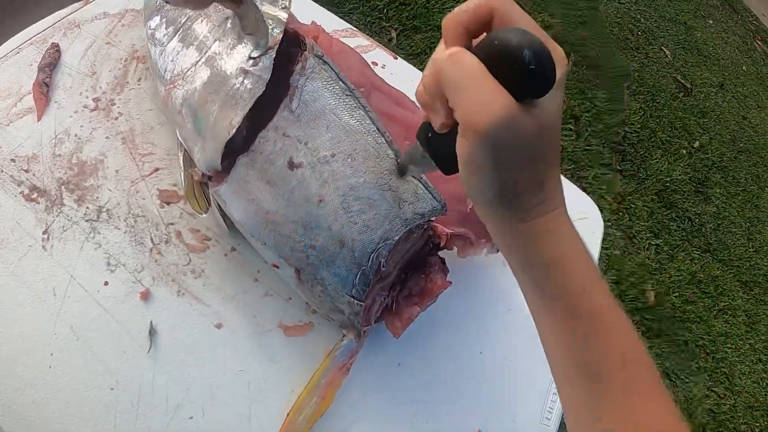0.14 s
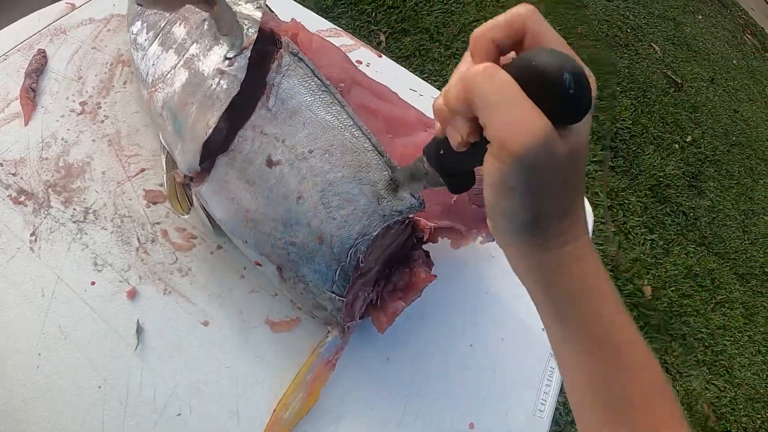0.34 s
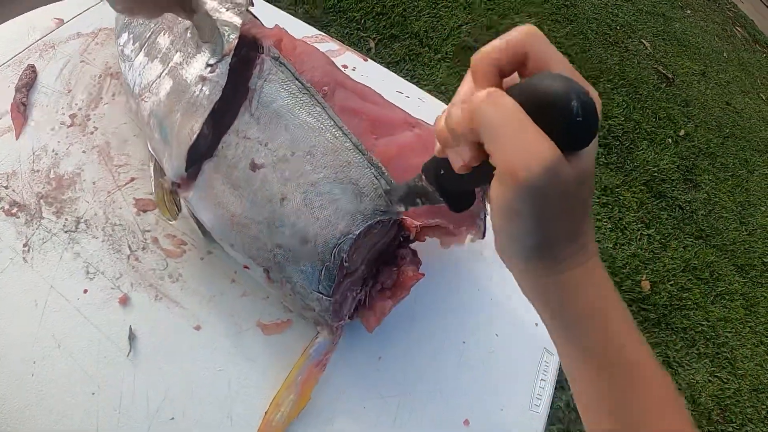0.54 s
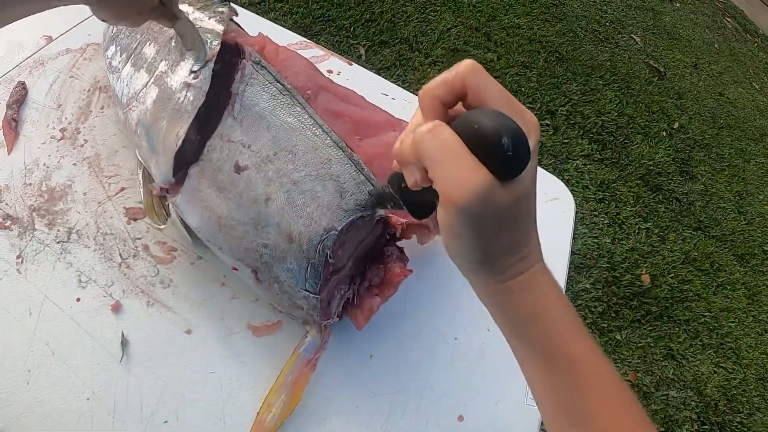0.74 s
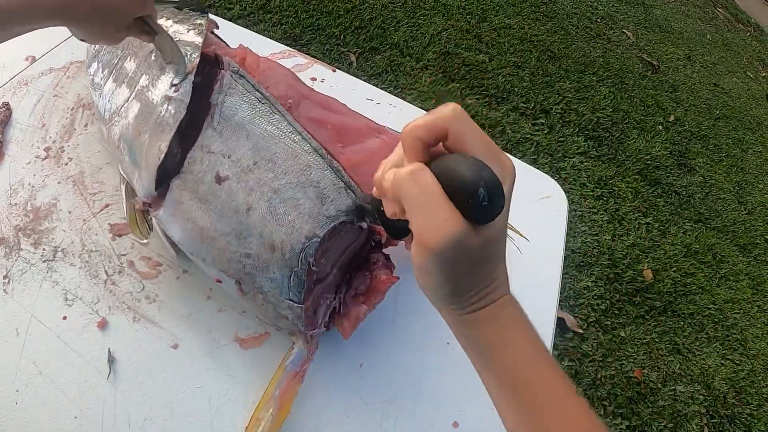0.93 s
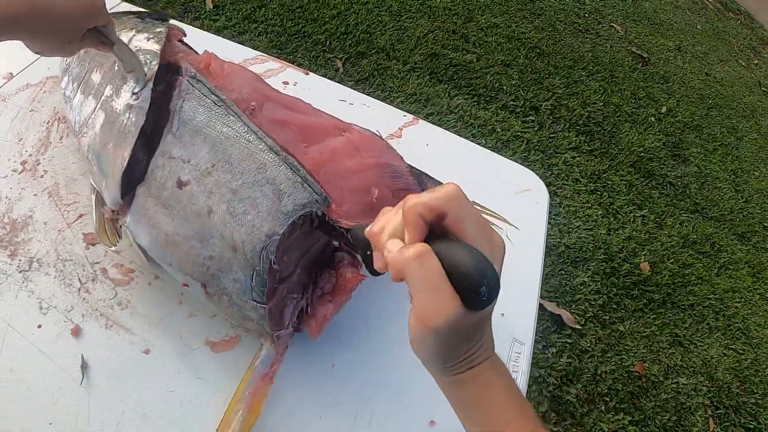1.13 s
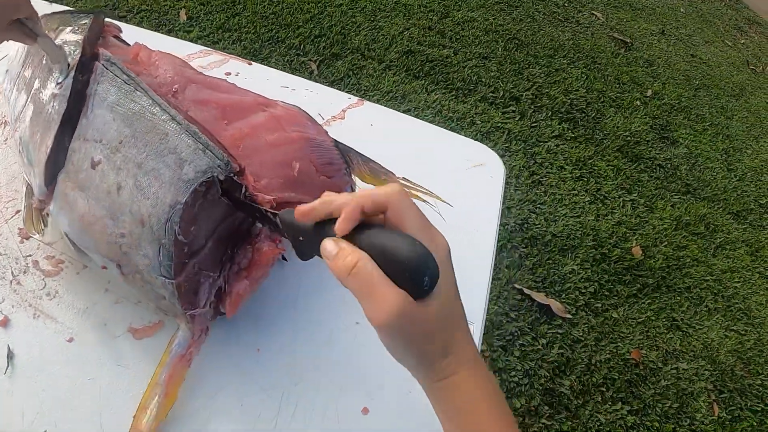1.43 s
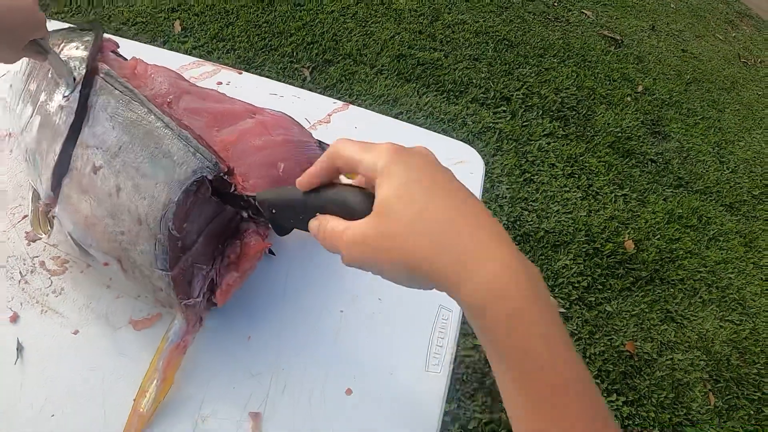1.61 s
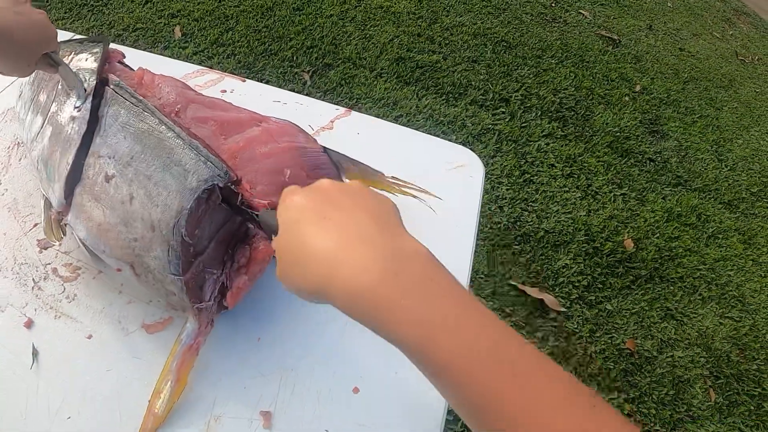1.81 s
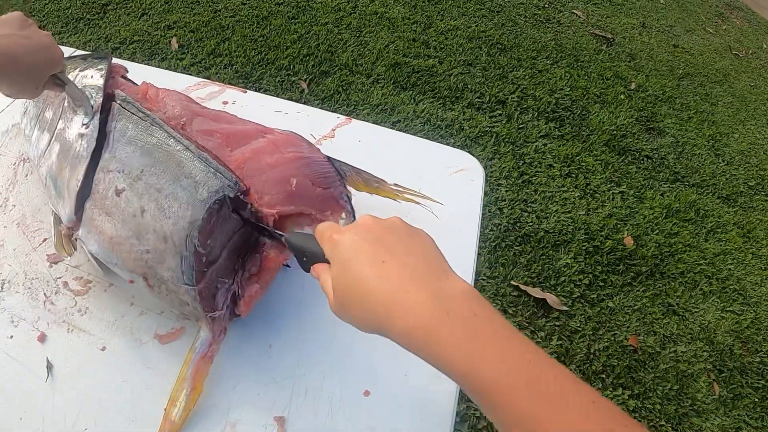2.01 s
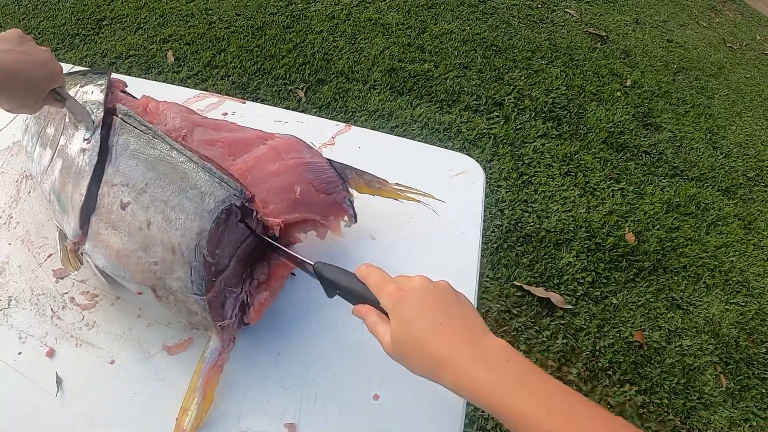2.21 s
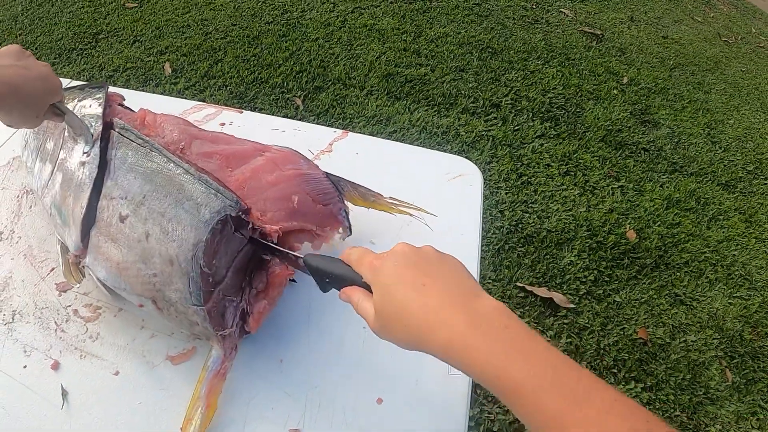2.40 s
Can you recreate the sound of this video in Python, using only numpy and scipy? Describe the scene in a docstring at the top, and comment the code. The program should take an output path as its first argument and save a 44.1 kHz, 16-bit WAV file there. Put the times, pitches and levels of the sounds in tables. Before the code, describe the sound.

Close knife cutting of a big raw fish: scratchy strokes, wet slides, sharp bone snaps, table knocks

```python
"""The blade is heard first, rasping through the skin of a large fish in short strokes, close by outdoors.
It slides and squelches through wet flesh and snaps past small bones, and shoves thud in a hollow
plastic table above a light wind rumble. Rasps are dense impulses, the slide is hiss with ticks, squelches
are narrow noise bands, snaps are noise bursts through resonances with short rings and low knocks,
thuds are low table modes with a dull rub, and wind is low noise with one puff."""
import sys
import numpy as np
from scipy.fft import rfft, irfft, next_fast_len
from scipy.io import wavfile

SR = 44100
rng = np.random.default_rng(int(sys.argv[2]) if len(sys.argv) > 2 else 0)


def log_audio(samples):
    """Write samples as a 16-bit WAV file to the path given in sys.argv[1]."""
    # one column per channel
    frames = np.atleast_2d(samples).T
    # limit to full scale, then quantise
    limited = np.clip(frames, -1, 1)
    pcm = np.round(limited * 32767).astype(np.int16)
    wavfile.write(sys.argv[1], SR, pcm)


N = 112454
T = np.arange(N) / SR  # time in s


def amp(db):
    """Level law: decibels to amplitude gain."""
    return 10 ** (np.asarray(db) / 20)


def unit(x):
    """Normalisation to an rms of 1."""
    return x / np.sqrt(np.mean(x ** 2) + 1e-20)


def along(points, hz):
    """Logarithmic frequency scale: interpolates (Hz, value) points."""
    f, v = np.transpose(points)
    return np.interp(np.log(hz + 1), np.log(f + 1), v)


def level(points):
    """Envelope: gain per sample from (s, dB) points, linear in decibels."""
    return amp(np.interp(T, *np.transpose(points)))


def filtered(x, response):
    """Linear filtering: multiplies the spectrum by a complex response of frequency."""
    n = x.shape[-1]
    m = next_fast_len(n + 4096)  # room for the tail
    spectrum = rfft(x, m) * response(np.fft.rfftfreq(m, 1 / SR))
    return irfft(spectrum, m)[..., :n]


def resonance(f, hz, width):
    """Damped resonance: causal band-pass response with a gain of 1 at its pitch."""
    return 1j * f * width / (hz * hz - f * f + 1j * f * width)


# Likeness of the two ports in diffuse sound: frequency_hz, correlation (no unit)
PORT_CORRELATION = [(100, 0.96), (2500, 0.45), (12000, 0.54)]


def coloured(pair, spectrum):
    """Partial coherence: mixes two unrelated signals into a stereo sound of rms 1 with this spectrum."""
    def mid_side(f):
        turn = np.arccos(np.clip(along(PORT_CORRELATION, f), -1, 1)) / 2
        return amp(along(spectrum, f)) * [np.cos(turn), np.sin(turn)]

    mid, side = filtered(pair, mid_side)
    return unit(np.array([mid + side, mid - side]))


def noise():
    """White noise: two independent Gaussian signals."""
    return rng.standard_normal((2, N))


def grains(rate, spread_db):
    """Random impulse train: shared times and uneven sizes, independent signs per channel, rms 1."""
    size = amp(spread_db * np.minimum(rng.exponential(size=N), 4))
    struck = rng.random(N) < rate / SR
    return unit(struck * size * np.sign(noise()))


def add(out, s, x):
    """Superposition: mixes x into out from time s."""
    part = out[..., max(0, round(s * SR)):][..., :x.shape[-1]]
    part += x[..., :part.shape[-1]]


# Level of the wind rumble: time_s, level_db
WIND_LEVEL = [(0, -49.5), (1.15, -45.5), (1.3, -53.5), (1.8, -52), (2.0, -47), (2.55, -49)]
# Spectrum of the wind rumble: frequency_hz, level_db
RUMBLE_SPECTRUM = [(15, -18), (80, 0), (130, -3), (200, -11.5), (320, -20.5), (450, -29), (3000, -46.5),
                   (12000, -92)]
PUFF_S, PUFF_HZ, PUFF_DB = 0.177, 66, -20  # middle, swing pitch, gain
PUFF_WIDTH_S = 0.0058  # from the middle to half the envelope


def wind():
    """Low-frequency pressure noise: a light rumble and one puff on the microphone, a brief enveloped swing."""
    t = T - PUFF_S
    swing = -np.sin(2 * np.pi * PUFF_HZ * t)
    puff = amp(PUFF_DB) * swing / (1 + (t / PUFF_WIDTH_S) ** 2)
    return level(WIND_LEVEL) * coloured(noise(), RUMBLE_SPECTRUM) + puff


# Shoves that thud in the table: start_s, level_db, length_s, rub_db (relative to level_db), rub_hz
THUDS = [(0.089, -37.5, 0.011, -17, 325), (0.15, -35.5, 0.012, -12, 530), (0.404, -37.5, 0.06, -8.5, 270),
         (0.543, -37.5, 0.0085, -15.5, 418), (0.657, -34.5, 0.038, -11.5, 286),
         (0.792, -35, 0.017, -16, 497), (0.906, -34.5, 0.029, -7, 269), (0.965, -43, 0.014, 1.5, 524),
         (1.042, -35.5, 0.043, -13.5, 382), (1.136, -31.5, 0.031, -12, 273.5),
         (1.376, -48, 0.045, -10, 284), (1.53, -47, 0.046, -12, 299), (1.643, -43.5, 0.023, -9.5, 296),
         (1.959, -35, 0.06, -28, 258), (2.082, -40, 0.029, -7, 278), (2.253, -29, 0.02, -18, 217),
         (2.362, -40.5, 0.019, -11.5, 287)]
# Low modes of the hollow table: pitch_hz, level_db (relative to the thud), t60_s
TABLE_MODES = [(84.8, -4.5, 0.32), (119.25, 0, 0.18), (167.5, -11.5, 0.042)]
JUDDER_DB, DETUNE = -5, 0.074  # noise in each mode; random spread of its pitch as a share
THUD_ATTACK_S, RUB_T60_S = 0.0017, 0.091
RUB_Q, RUB_SKIRT_DB = 3.15, -5  # sharpness of the rub's pitch; level of the broad noise around it


def table():
    """Modal vibration: each shove holds the low modes ringing, then they decay, with a dull rub on top."""
    out, t = np.zeros(N), np.arange(SR // 3) / SR

    def band(hz, width):
        hiss = rng.standard_normal(len(t))
        return unit(filtered(hiss, lambda f: resonance(f, hz, width) ** 2))

    def shape(length, t60):
        return (1 - np.exp(-t / THUD_ATTACK_S)) * amp(-60 * np.maximum(t - length, 0) / t60)

    for s, db, length, rub_db, rub_hz in THUDS:
        for hz, mode_db, t60 in TABLE_MODES:
            judder = band(hz, hz / 2)
            tone_hz = hz * (1 + rng.normal(0, DETUNE))
            swing = np.sin(2 * np.pi * tone_hz * t) + amp(JUDDER_DB) * judder
            add(out, s, amp(db + mode_db) * shape(length, t60) * swing)
        rub = band(rub_hz, rub_hz / RUB_Q) + amp(RUB_SKIRT_DB) * band(rub_hz, 2 * rub_hz)
        add(out, s, amp(db + rub_db) * shape(length, RUB_T60_S) * unit(rub))
    return out


# Wet flesh squelching around the blade: middle_s, half_length_s, level_db, pitch_hz (at the middle)
SQUELCHES = [(.88, .1, -65.5, 2013), (1.667, 0.049, -68, 2490), (1.991, 0.039, -57, 2036),
             (2.5, .08, -62.5, 2392)]
SQUELCH_WIDTH_HZ = 370  # half width of the band
SQUELCH_SAG = 0.034  # share by which the pitch starts above and ends below its middle


def squelches():
    """Narrow-band resonance: the wet slit around the blade sinks in pitch as the cut opens."""
    out = np.zeros(N)
    for s, half_length, db, hz in SQUELCHES:
        u = (T - s) / half_length
        flutter = filtered(rng.standard_normal(N), lambda f: 1 / (1 + (f / SQUELCH_WIDTH_HZ) ** 2))
        pitch = hz * (1 - SQUELCH_SAG * np.tanh(u))
        phase = 2 * np.pi * np.cumsum(pitch) / SR
        out += amp(db) * np.exp(-u ** 2) * unit(flutter * np.sin(phase))
    return out


# Level of the blade sliding through flesh: time_s, level_db (of the hiss)
SLIDE_LEVEL = [(0, -70), (.22, -64.5), (.37, -66), (.47, -50.5), (.74, -54), (.8, -65.5), (1.03, -66),
               (1.17, -59.5), (1.23, -62.5), (1.45, -65.5), (1.55, -60), (1.72, -74.5), (1.88, -66),
               (1.95, -53.5), (2.08, -73.5), (2.19, -74), (2.31, -65)]
# Spectrum of wet flesh: frequency_hz, level_db
FLESH_SPECTRUM = [(100, -9.5), (500, 8), (1200, 4.5), (2500, 6), (3300, 4), (7000, -1.5), (8500, -8),
                  (16000, -31.5)]
TICKS_PER_S, TICK_SPREAD_DB, TICK_DB = 400, 3, -4  # TICK_DB is relative to the hiss


def flesh():
    """Stick-slip friction: a soft wet hiss along the blade, dotted with sticky ticks."""
    hiss = coloured(noise(), FLESH_SPECTRUM)
    ticks = coloured(grains(TICKS_PER_S, TICK_SPREAD_DB), FLESH_SPECTRUM)
    return level(SLIDE_LEVEL) * (hiss + amp(TICK_DB) * ticks)


# Strokes of the blade through skin: peak_s, rise_s, fall_s, level_db (at the peak)
RASPS = [(0.031, .07, 0.051, -47.5), (0.156, 0.065, 0.022, -43), (0.303, 0.068, 0.079, -50.5),
         (0.442, 0.043, 0.013, -37), (.573, 0.047, 0.027, -49), (0.677, 0.019, 0.033, -41),
         (1.001, 0.072, 0.012, -60), (2.253, 0.022, 0.043, -37.5)]
# Spectrum of tearing skin: frequency_hz, level_db
SKIN_SPECTRUM = [(150, -30), (500, -6), (3500, 0.5), (6000, -3), (9000, -4), (12500, -12.5), (16000, -26.5)]
GRAINS_PER_S, GRAIN_SPREAD_DB, RASP_NOISE_DB = 1700, 8.5, 2  # the noise is relative to the grains


def skin():
    """Granular tearing: strokes of dense grains swell and drop by 20 dB over their rise and fall times."""
    stroke = np.zeros(N)
    for s, rise, fall, db in RASPS:
        distance = np.where(T < s, (s - T) / rise, (T - s) / fall)
        stroke += amp(db - 20 * distance ** 1.34)
    tearing = grains(GRAINS_PER_S, GRAIN_SPREAD_DB) + amp(RASP_NOISE_DB) * noise()
    return stroke * coloured(tearing, SKIN_SPECTRUM)


# Snaps of the blade past bones: start_s, level_db (rms of the first 4 ms),
# knock_db (added to KNOCK_DB), treble_db (from 7 kHz up), ring_hz
SNAPS = [(0.2904, -43.5, -21, 30, 9140), (0.6323, -45.5, -7, 8, 6900), (0.6765, -32.5, 4.5, 6.5, 1610),
         (1.072, -18.5, 1, 2.5, 1990), (1.107, -42, 6, -9, 1830), (1.1354, -22, 7.5, -0.5, 3425),
         (1.2525, -40.5, -22, -1, 3500), (1.2904, -51, 1, 3, 4660), (1.3508, -31.5, -9.5, 0, 3330),
         (1.4606, -49, -5, -8.5, 3620), (1.9097, -23.5, -1, -1, 3700), (1.9567, -31, 1.5, -8, 2590),
         (2.0115, -46.5, -4, -8, 2430), (2.2337, -34, -2, -4, 3600), (2.2528, -21.5, 7.5, -5.5, 2860),
         (2.262, -22, -3, 0, 2860), (2.2783, -22.5, 8, 6, 2780)]
# Resonances that colour every snap: pitch_hz, width_hz, level_db
BONE_MODES = [(1374, 310, 2.5), (2210, 930, 3), (2910, 610, 2), (3300, 380, 2), (4810, 1340, -2.5),
              (7090, 730, -5), (8940, 770, -10), (12840, 3500, -35)]
KNOCK_HZ, KNOCK_S, KNOCK_DB = 706, 0.0021, -13  # levels of knock and ring are relative to the crack
SPLINTER_S, RING_S, RING_DB = 0.0023, 0.0021, -5  # how long fibres give way; life and level of the ring
SQUISH_S, SQUISH_DB = 0.029, -23  # wet flesh settles after a snap
SNAP_SIDE_DB = -6.5  # share of a snap that differs between the ports


def bones():
    """Impulsive excitation: splintering drives bone resonances, with a short ring and a low knock."""
    out, t = np.zeros((2, N)), np.arange(SR // 16) / SR

    def burst(shape):
        return unit(rng.standard_normal((2, len(t))) * shape)

    def tone(hz, life):
        return unit(np.sin(2 * np.pi * hz * t) * np.sqrt(t) * np.exp(-2 * t / life))

    def body(f):  # neighbouring modes have opposite signs
        return sum((-1) ** k * amp(g) * resonance(f, hz, w) for k, (hz, w, g) in enumerate(BONE_MODES))

    for s, db, knock_db, treble_db, hz in SNAPS:
        def colour(f):
            thin = (f * f / (f * f + (hz / 2) ** 2)) ** 2  # a small bone radiates little below its pitch
            treble = amp(along([(3000, 0.003), (7000, treble_db)], f))
            return body(f) * thin * treble

        splinter = burst(np.exp(-(t / SPLINTER_S) ** 2))
        squish = burst(np.exp(-t / SQUISH_S))
        mid, side = splinter + amp(SQUISH_DB) * squish
        force = mid + amp(SNAP_SIDE_DB) * np.array([side, -side])
        crack = unit(filtered(force, colour))
        ring = amp(RING_DB) * tone(hz, RING_S)
        knock = amp(KNOCK_DB + knock_db) * tone(KNOCK_HZ, KNOCK_S)
        snap = crack + ring + knock
        add(out, s, amp(db) * snap / np.sqrt(np.mean(snap[:, :SR // 250] ** 2)))
    return out


def scene():
    """Superposition of wind, table and knife."""
    return wind() + table() + squelches() + flesh() + skin() + bones()


# Colour difference between the ports: frequency_hz, level_db (left above right)
LEFT_COLOUR = [(600, 0), (1400, 1), (2700, -4), (5000, 1.5), (8500, 4), (12000, 0)]
LAG_S, TOP_HZ = 0.000044, 16500  # the right port hears later; upper band limit


def record(dry):
    """Interchannel difference: two close ports with slightly different colour and delay, and a band limit."""
    sides = np.array([[.5], [-.5]])  # each port takes half the difference

    def ports(f):
        colour = amp(sides * along(LEFT_COLOUR, f))
        lag = np.minimum(2 * np.pi * f * LAG_S, np.pi / 2)  # phase in radians
        return colour * np.exp(1j * sides * lag) * (f < TOP_HZ)

    return filtered(dry, ports)


dry = scene()
out = record(dry)
log_audio(out)
```